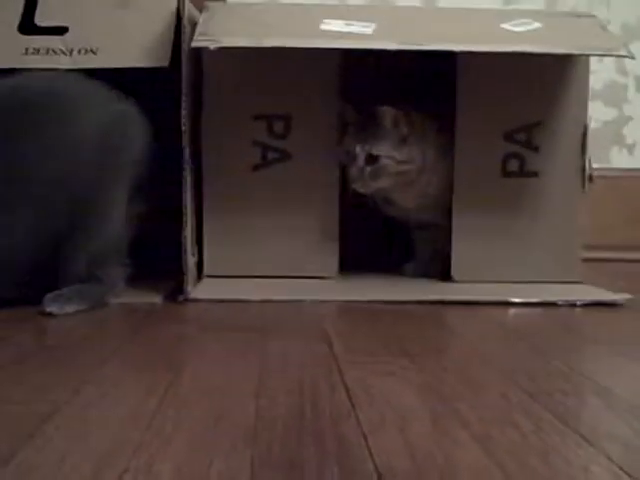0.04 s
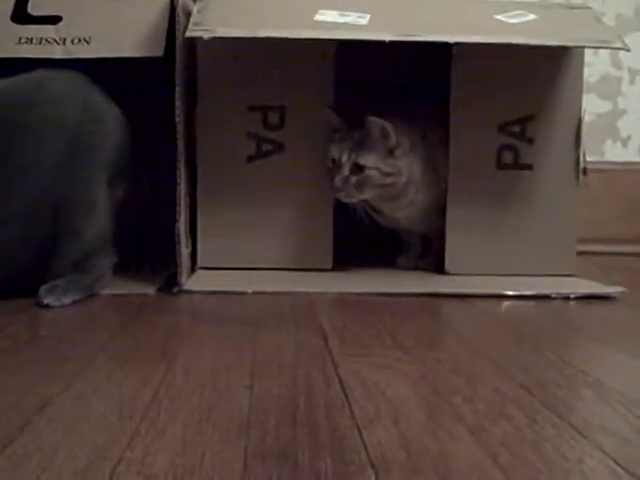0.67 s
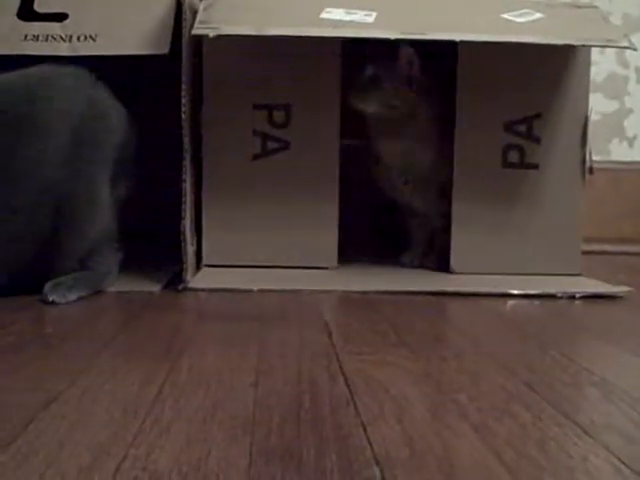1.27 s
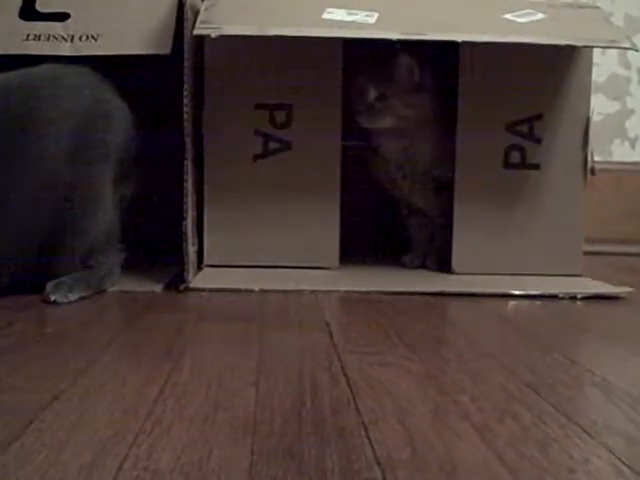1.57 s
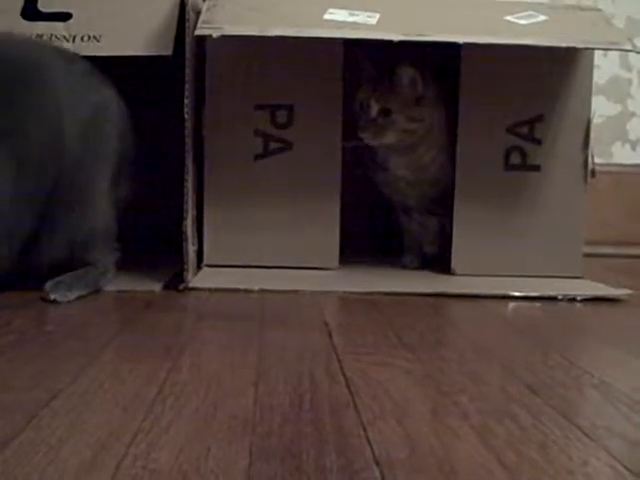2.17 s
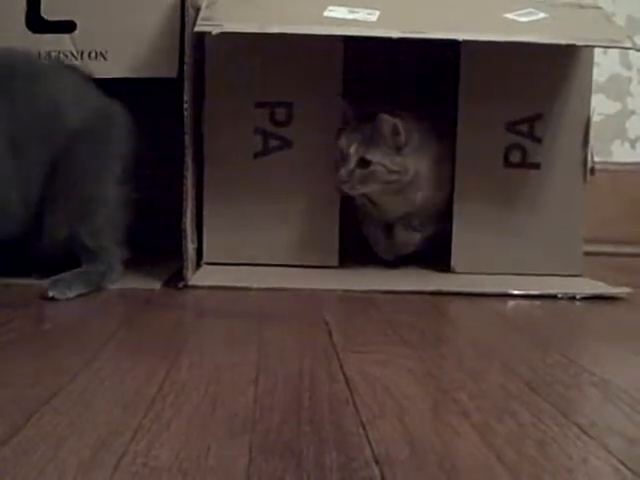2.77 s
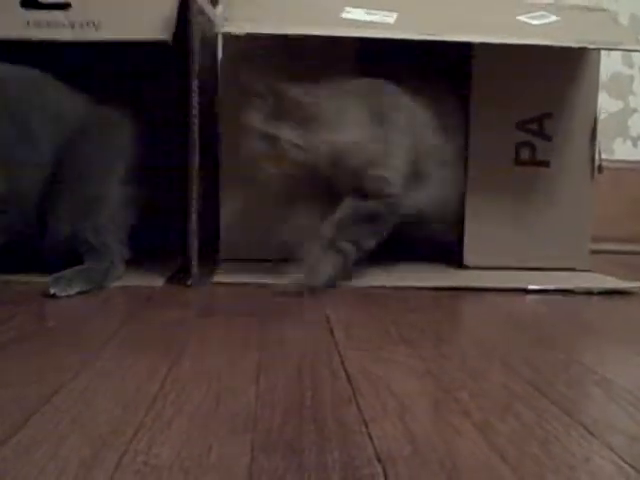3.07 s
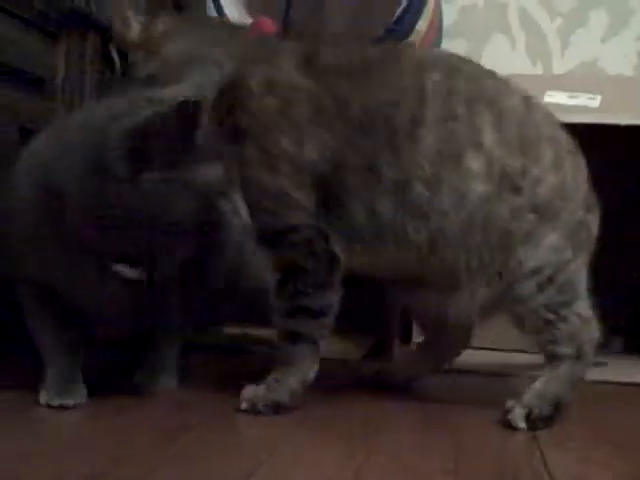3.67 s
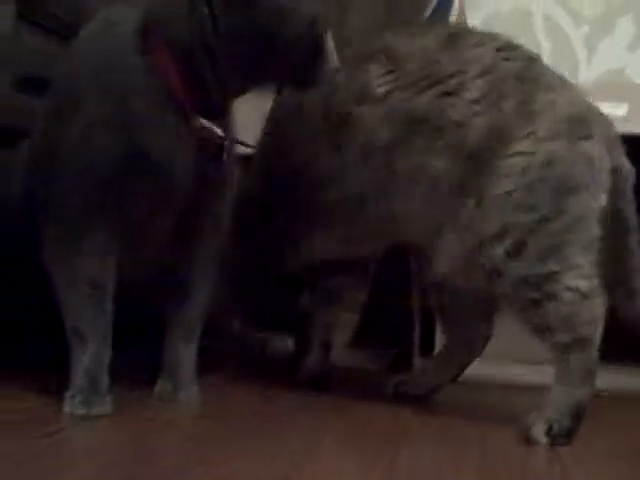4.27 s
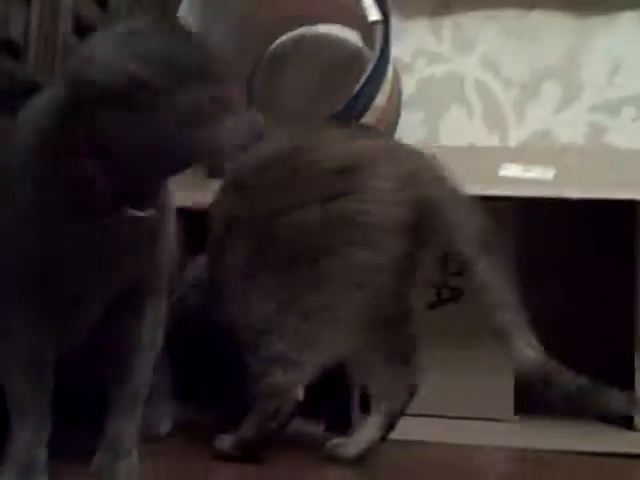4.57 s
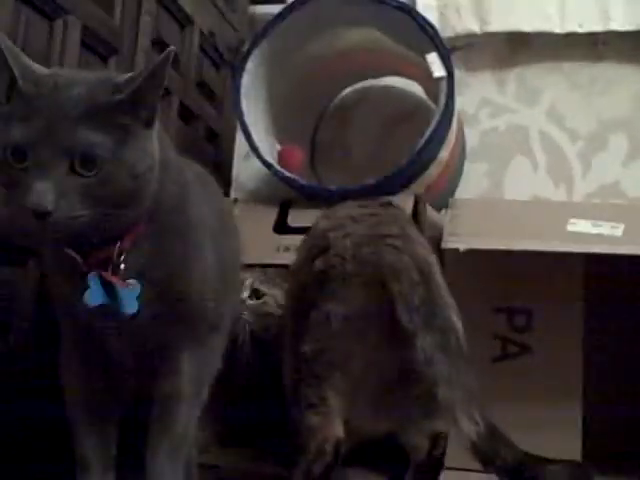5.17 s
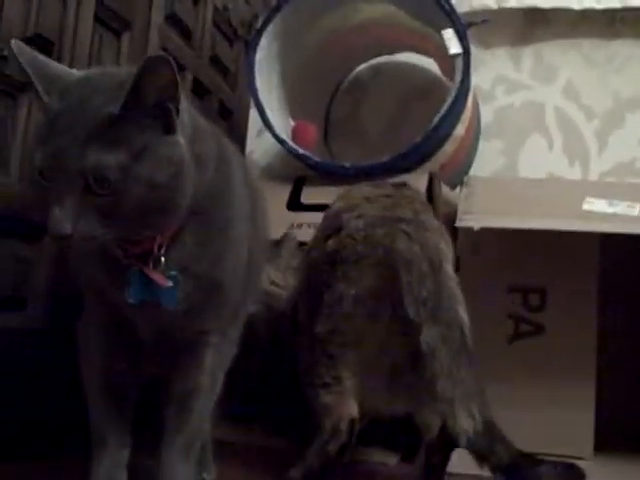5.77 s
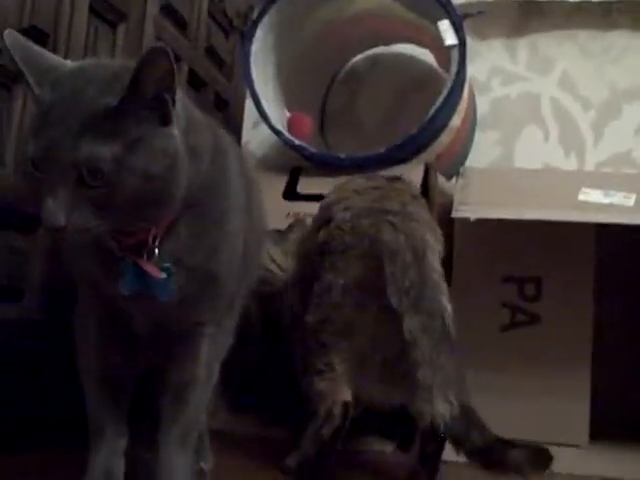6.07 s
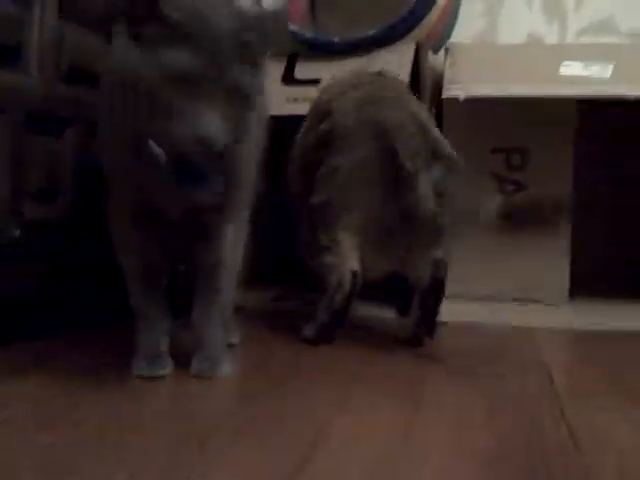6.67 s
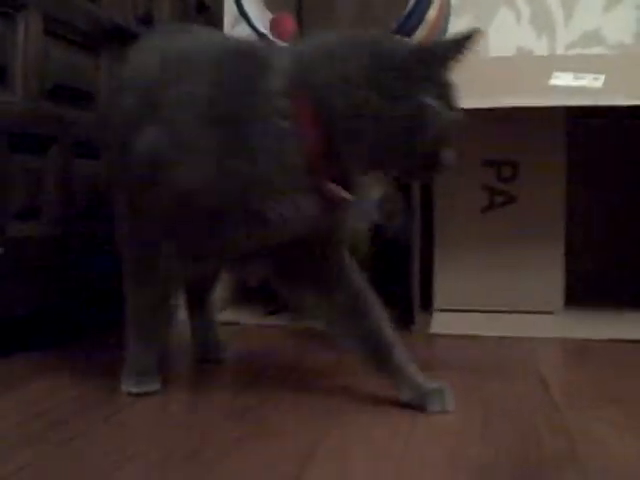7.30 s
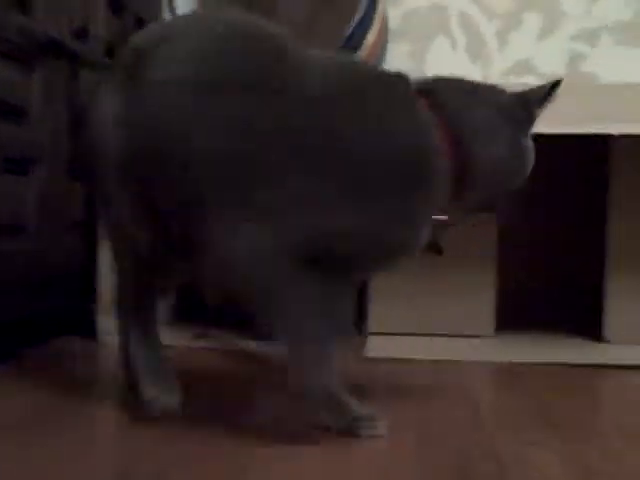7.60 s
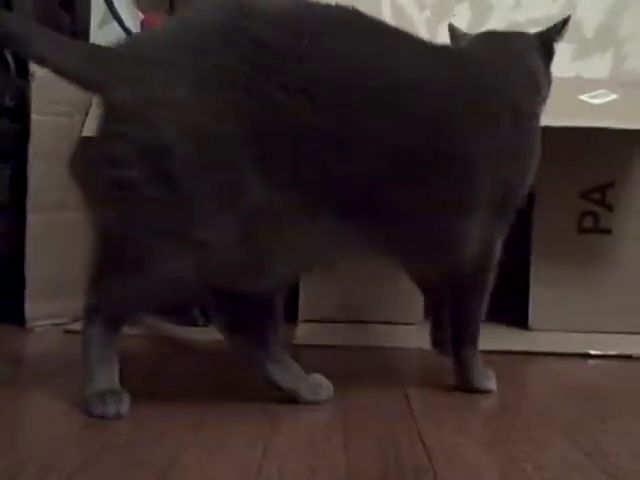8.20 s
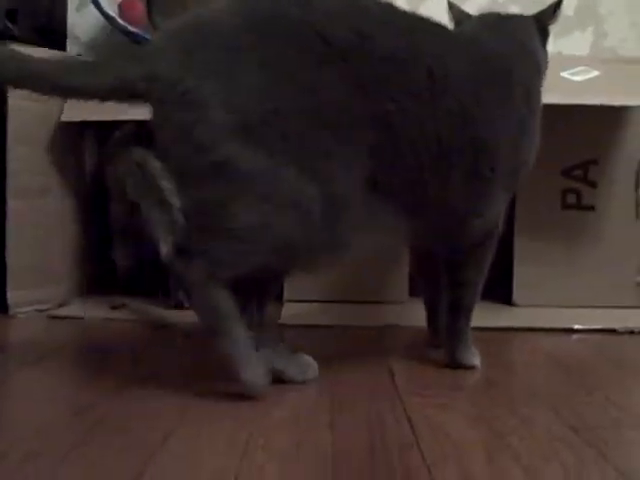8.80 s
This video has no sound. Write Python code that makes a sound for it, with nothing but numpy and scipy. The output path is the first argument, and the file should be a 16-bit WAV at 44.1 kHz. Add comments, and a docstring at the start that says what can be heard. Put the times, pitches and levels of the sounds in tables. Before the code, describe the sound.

Faint cardboard scratches and taps sound over a soft indoor hum, until a cat bursts through the box flaps with a quick cluster of booming bumps and a rasp. A nearby collar tag clinks, then jingles briefly twice more, among padded steps on floorboards and a slight rustle of fur. Scattered claw clicks trail off. The room adds a short echo, mostly to the box.

```python
"""Cardboard scrapes and rustles faintly in a quiet, humming room: two cats are playing around boxes.
One pushes out through the flaps, and the box booms in its low modes, slaps and rasps with friction.
The other's metal collar tag clinks against its ring in short bursts, quickly damped by fur.
Paws thump the wooden floor, claws tick and coats rustle; the room adds a short reverberation."""
import sys
import numpy as np
from scipy import signal
from scipy.fft import rfft
from scipy.io import wavfile

SR = 44100
rng = np.random.default_rng(int(sys.argv[2]) if len(sys.argv) > 2 else 0)


def wav_record(signal):
    """Record a signal, one row per channel, as 16-bit PCM in the file named by sys.argv[1]."""
    frames = np.transpose(np.atleast_2d(signal))
    bounded = np.clip(frames, -1, 1)
    # unit amplitude maps onto the largest positive 16-bit level
    quanta = np.round(bounded * 32767).astype(np.int16)
    wavfile.write(sys.argv[1], SR, quanta)


N = 394631
TIME = np.arange(N) / SR
AGE = TIME[:SR // 2]  # seconds since a blow

# resonances of the cardboard panels: centre_hz, width_hz, lift_db
PANEL_MODES = [(560, 90, 5), (845, 110, 1), (1290, 200, 4), (1764, 180, 4.5), (2430, 250, 1.5)]
# spectrum of rasping cardboard: frequency_hz, density_db
RASP_SPECTRUM = [(100, -45), (300, -2), (600, 2.5), (1300, -2), (2500, -1.5), (3800, -12), (8000, -27.5)]
# spectrum of sliding fur: frequency_hz, density_db
FUR_SPECTRUM = [(1000, -23), (3000, -5), (5000, -4.5), (8000, -3), (12000, -5.5), (15500, -5.5)]
# bending modes of the tag: pitch_hz
TAG_MODES_HZ = [10405, 11985, 15270]
# balance of those modes: level_db, change_at_centre_db
TAG_BALANCE = [(1, -2.5), (2, 7), (-3, -10.5)]


def box_bumps():
    """Forced vibration: the leaping cat's body drives the low modes of the box."""
    # bumps against the box: start_s, level_db
    bumps = [(3.075, -39.5), (3.143, -15.5), (3.1609, -12.5), (3.1955, -16.5), (3.292, -29), (3.347, -38),
             (3.424, -38)]
    # modes of the box: pitch_hz, level_db, t60_s
    box_modes = [(137.8, -3, 0.095), (168, -7, 0.075), (193.7, 0, .11), (252, -7.5, 0.085),
                 (371, -15, 0.059)]
    return thumps(bumps, box_modes, shudder_db=-12, shudder_t60=0.17)


def flap_slaps(rise_s=0.0019, ring_db=-17, ring_t60=0.037):
    """Impact excitation: flaps slap and buckle, ringing the stiff, well-damped panels."""
    # flap impacts: start_s, level_db, t60_s
    slaps = [(.2515, -54, 0.035), (1.919, -42.5, .035), (3.1443, -25, 0.085), (3.2647, -13, 0.03),
             (3.424, -41, .04), (3.55, -50, .04), (4.544, -49, 0.038)]
    # spectrum of a slap: frequency_hz, density_db
    spectrum = [(150, -16.5), (400, -5), (750, 6), (1300, 2.5), (2200, -10), (3500, -7.5), (6000, -7.5),
                (9000, -8), (15500, -33)]
    out = np.zeros(N)
    ring = sum(mode(hz, ring_db + lift, ring_t60) for hz, _, lift in PANEL_MODES)
    for s, db, t60 in slaps:
        slap = burst(spectrum, t60, PANEL_MODES) + ring
        add(out, s, amp(db) * slap * (1 - np.exp(-AGE / rise_s)))
    return out


def tag_clinks(clack_db=-2, clack_t60=0.035, snap_db=2, snap_t60=0.0029,
               linger_db=-26, linger_t60=.22, detune=0.003):
    """Plate bending: the striking point sets the mix of modes; fur damps all but a faint after-ring."""
    # blows on the tag: start_s, level_db, place (-1 rim to 1 centre), t60_s
    hits = [(3.235, -24, 0.62, .04), (3.3913, -34, 0.79, .023), (3.6554, -41, -.6, .11),
            (3.7244, -34, 0.54, 0.088), (3.8653, -44.5, 0.73, .035), (4.651, -37.5, 1, 0.068),
            (4.7424, -51, -.7, 0.026), (4.7602, -26, 1, 0.034), (4.7642, -23.5, .6, .024),
            (4.79, -38.5, -.2, .015), (4.8234, -34.5, -0.46, .05), (6.534, -21.5, 0.74, .11),
            (6.602, -36.5, -0.52, .026), (6.669, -33, 0.016, .08), (6.7239, -20, -0.54, .073),
            (6.743, -26.5, -0.22, .062), (6.792, -44.5, -.2, .14), (7.487, -61, -0.014, .06)]
    # spectrum of the metal contact: frequency_hz, density_db
    spectrum = [(150, -24), (500, -5.5), (1100, -12.5), (2300, -10.5), (5000, -10), (7300, -4), (10000, -8),
                (15500, -2)]
    out = np.zeros(N)
    for s, strength_db, place, t60 in hits:
        for hz, (mode_db, centre_db) in zip(TAG_MODES_HZ, TAG_BALANCE):
            db = strength_db + mode_db + place * centre_db
            bent_hz = hz * (1 + detune * rng.standard_normal())  # contact with the ring shifts the mode
            add(out, s, mode(bent_hz, db, t60) + mode(hz, db + linger_db, linger_t60))
        snap = amp(snap_db) * burst(spectrum, snap_t60)
        clack = amp(clack_db) * burst(spectrum, clack_t60)
        add(out, s, amp(strength_db) * (snap + clack))
    return out


def collar_fittings():
    """Free vibration: the loose split ring sings on after a blow; the clasp's modes die at once."""
    # blows on the ring and on the clasp: start_s, level_db
    ring_hits = [(6.669, -53), (6.7235, -41.5)]
    clasp_hits = [(4.7607, -21.5), (4.7917, -29), (4.824, -32), (6.7237, -21.5)]
    # modes of each part: pitch_hz, level_db, t60_s
    ring_modes = [(3359, -7, .32), (6767, 3, .15)]
    clasp_modes = [(3910, -7, 0.017), (4700, -15.5, 0.0086), (7700, -5.5, 0.0088), (8470, 0, 0.01),
                   (8700, -5, 0.0089)]
    out = np.zeros(N)
    for hits, modes in (ring_hits, ring_modes), (clasp_hits, clasp_modes):
        clink = sum(mode(*row) for row in modes)
        for s, db in hits:
            add(out, s, amp(db) * clink)
    return out


def box_rubbing(slips_per_s=2500, spread_db=3.0, clump_db=2.5, rasp_db=-2, fur_db=2):
    """Stick-slip friction: clumps of tiny slips drive the panels while fur hisses along the edges."""
    # paws and flanks scraping cardboard: peak_s, level_db, grip_s, release_s
    scrapes = [(.18, -62.5, 0.057, 0.065), (0.255, -53, .003, 0.02), (.29, -56, .007, 0.082),
               (.58, -59, 0.013, 0.031), (1.924, -46.5, 0.019, 0.023), (2.015, -52, .04, 0.035),
               (2.14, -66, .02, 0.036), (3.08, -48, 0.041, 0.15), (3.151, -32.5, 0.0047, 0.061),
               (3.268, -34.5, .003, 0.047), (3.52, -52, .006, .02), (4.55, -51.5, 0.0096, .025)]
    # fur brushing the edges: peak_s, level_db, swell_s
    brushes = [(.362, -58, 0.019), (.615, -57, 0.014), (.77, -68, 0.047), (1.862, -63.5, .016),
               (2.57, -62, 0.082), (3.075, -51.5, 0.091), (3.208, -40, 0.013), (3.278, -38.5, .028),
               (3.45, -63.5, 0.055), (4.55, -65, 0.023)]
    slip_size = amp(spread_db * np.minimum(rng.exponential(1, N), 4))
    slips = slip_size * rng.choice([-1, 1], N) * (rng.random(N) < slips_per_s / SR)
    hiss = unit(slips) / 2 + rng.standard_normal(N)
    grip = amp(clump_db * drift(70.4))
    rasp = sum(stroke(*row) for row in scrapes) * colour(slips, RASP_SPECTRUM, PANEL_MODES)
    fur = swells(brushes) * colour(hiss, FUR_SPECTRUM)
    return grip * (amp(rasp_db) * rasp + amp(fur_db) * fur)


def paw_falls():
    """Cushioned impact: soft paws excite the low modes of the floorboards."""
    # landings: start_s, level_db
    paws = [(3.21, -31), (3.405, -36.5), (3.446, -37), (4.547, -38), (4.581, -41.5), (4.728, -44),
            (4.784, -44), (7.039, -44.5)]
    # modes of the boards: pitch_hz, level_db, t60_s
    board_modes = [(77, -1.5, .15), (350, -1.5, .042)]
    return thumps(paws, board_modes, shudder_db=-5.5, shudder_t60=0.18)


def taps(tick_t60=0.024, click_db=-4, click_t60=0.0087):
    """Brief contacts have broad spectra: dry ticks, and clicks that ring one hollow resonance."""
    # ticks of claws and small collar parts: start_s, level_db, tilt_db_per_octave
    ticks = [(3.155, -21, 5.5), (4.264, -53, -3), (4.545, -41, -0.5), (4.593, -55, -1), (4.62, -54, 0),
             (4.92, -46, -2.5), (6.633, -52, 3), (6.655, -43, 5), (6.877, -52.5, 0), (7.05, -45.5, 2),
             (7.196, -42.5, 7.5), (7.344, -48.5, -1), (7.728, -49, 0.5), (7.805, -44.5, 0.5),
             (7.934, -54, -4), (7.972, -52.5, 0)]
    # spectrum of a tick: frequency_hz, density_db
    spectrum = [(200, -11.5), (1200, -2), (3500, 0), (6000, -6), (15500, -5)]
    # hollow knocks and pops: start_s, level_db, pitch_hz, t60_s
    pops = [(0.575, -51.5, 2370, 0.052), (1.598, -51, 595, 0.051), (1.917, -50, 827, 0.12),
            (6.876, -47.5, 568, 0.042), (7.416, -40.5, 1320, 0.029), (7.429, -46, 1560, 0.026),
            (7.969, -47.5, 595, 0.053), (8.635, -57, 1592, 0.034)]
    out = np.zeros(N)
    for s, db, tilt in ticks:
        tilted = [(hz, level + tilt * np.log2(hz)) for hz, level in spectrum]
        add(out, s, amp(db) * burst(tilted, tick_t60))
    for s, db, hz, t60 in pops:
        add(out, s, mode(hz, db, t60) + amp(db + click_db) * burst(RASP_SPECTRUM, click_t60))
    return out


def coat_rustle(flutter_db=2):
    """Friction noise: fur slides under the collar with a soft, uneven hiss."""
    # turns and steps of the cats: peak_s, level_db, swell_s
    moves = [(2.05, -67, 0.23), (4.29, -70.5, 0.11), (4.68, -65.5, .1), (5.06, -68, 0.067),
             (6.52, -58.5, .1), (7.05, -58.5, 0.011), (7.4, -70, 0.36)]
    return swells(moves) * amp(flutter_db * drift(25)) * colour(rng.standard_normal(N), FUR_SPECTRUM)


def squeak(jitter=.07, flutter_db=3):
    """Random modulation of pitch and level roughens a faint, thin tone."""
    # course of the squeak: time_s, level_db, pitch_hz
    contour = [(7.43, -77, 1610), (7.6, -66.5, 1705), (7.76, -74, 1670)]
    s, db, hz = np.transpose(contour)
    pitch_hz = np.interp(TIME, s, hz) * (1 + jitter * drift(146))
    level = amp(np.interp(TIME, s, db) + flutter_db * drift(50)) * (TIME > s[0]) * (TIME < s[-1])
    return level * np.sin(2 * np.pi * np.cumsum(pitch_hz) / SR)


def tag_shimmer(width_hz=45):
    """Frictional excitation: sliding on its ring keeps the tag's modes sounding unevenly."""
    # slides of the tag: peak_s, level_db, swell_s
    slides = [(2.06, -70, 0.045), (2.24, -72, 0.058)]
    ring = sum(amp(db + centre_db) * drift(width_hz) * np.sin(2 * np.pi * hz * TIME)
               for hz, (db, centre_db) in zip(TAG_MODES_HZ, TAG_BALANCE))
    return swells(slides) * unit(ring)


def room_echoes(x, early_db=-11, early_t60=0.028, tail_db=-16, delay_s=0.0066, build_up_s=0.015):
    """Reverberation: early reflections off floor and boxes, then a tail whose treble dies first."""
    # reverberation times: frequency_hz, t60_s
    decay_times = [(100, 1), (500, 0.88), (3000, 0.44), (11000, 0.35), (16000, 0.27)]
    hz, t, bands = signal.stft(rng.standard_normal(len(AGE)), SR, nperseg=256)
    bands *= np.exp(-np.log(1000) * t / read(decay_times, hz)[:, None])
    tail = signal.istft(bands, SR, nperseg=256)[1][:len(AGE)]
    tail *= 1 - np.exp(-(AGE / build_up_s) ** 2)
    early = rng.standard_normal(len(AGE)) * (rng.random(len(AGE)) < 2000 / SR)  # 2000 echoes a second
    early *= fade(early_t60) * (AGE > delay_s)
    response = amp(early_db) * early / np.linalg.norm(early) + amp(tail_db) * tail / np.linalg.norm(tail)
    return signal.fftconvolve(x, response)[:N]


def room_tone(air_db=-59, waver_rad=0.13):
    """Background noise: steady broadband air, and an appliance's hum wavering in phase."""
    # spectrum of the air noise: frequency_hz, density_db
    spectrum = [(12, -41.5), (20, -13.5), (64, -6.5), (85, -12), (175, -8.5), (207, -14.5), (238, -8.5),
                (282, -14), (352, -16), (478, -16.5), (631, -21.5), (1380, -28), (1580, -27), (2090, -30.5),
                (15500, -41.5)]
    # partials of the hum: pitch_hz, level_db
    partials = [(60, -72.5), (239, -63)]
    hum = sum(amp(db) * unit(np.sin(2 * np.pi * (hz * TIME + rng.random()) + waver_rad * drift(1.3)))
              for hz, db in partials)
    return amp(air_db) * colour(rng.standard_normal(N), spectrum) + hum


def thumps(hits, modes, shudder_db, shudder_t60, rise_s=0.00515):
    """Modal superposition: a padded blow builds up, rings the low modes and shakes the rest."""
    # spectrum of the dull shudder: frequency_hz, density_db
    spectrum = [(30, -16), (80, -14), (135, -6.5), (200, 3), (360, -4.5), (550, -13), (1200, -22.5),
                (4000, -62.5)]
    out = np.zeros(N)
    ring = sum((-1) ** k * mode(*row) for k, row in enumerate(modes))  # neighbours push opposite ways
    for s, db in hits:
        blow = ring + amp(shudder_db) * burst(spectrum, shudder_t60)
        add(out, s, amp(db) * blow * (1 - np.exp(-AGE / rise_s)))
    return out


def mode(hz, db, t60):
    """A damped harmonic oscillator, struck once."""
    return amp(db) * fade(t60) * np.sin(2 * np.pi * hz * AGE)


def burst(spectrum, t60, peaks=()):
    """Modal overlap: dense modes merge into decaying noise."""
    return colour(rng.standard_normal(len(AGE)), spectrum, peaks) * fade(t60)


def fade(t60):
    """Exponential decay, by 60 dB in t60 seconds."""
    return np.exp(-np.log(1000) * AGE / t60)


def stroke(peak_s, db, rise_s, fall_s):
    """Envelope of one rub: exponential growth, then decay."""
    late = TIME - peak_s
    return amp(db) * np.exp(-np.maximum(-late / rise_s, late / fall_s))


def swells(rows, settle_ratio=1.88):
    """Envelope of soft strokes that settle more slowly than they swell."""
    return sum(stroke(s, db, swell_s, settle_ratio * swell_s) for s, db, swell_s in rows)


def colour(x, spectrum, peaks=()):
    """Filters x by a smooth spectrum with resonant peaks, to rms 1."""
    hz = np.fft.rfftfreq(len(x), 1 / SR)
    resonance_db = sum(lift / (1 + (2 * (hz - centre) / width) ** 2) for centre, width, lift in peaks)
    return unit(np.fft.irfft(rfft(x) * amp(read(spectrum, hz) + resonance_db), len(x)))


def drift(rate_hz):
    """Random fluctuation: low-passed noise of rms 1."""
    hz = np.fft.rfftfreq(N, 1 / SR)
    return unit(np.fft.irfft(rfft(rng.standard_normal(N)) * np.exp(-(hz / rate_hz) ** 2), N))


def read(points, hz):
    """Interpolates on a log-frequency axis."""
    point_hz, value = np.transpose(points)
    return np.interp(np.log(hz + 1), np.log(point_hz), value)


def amp(db):
    """Decibels to gain."""
    return 10 ** (np.asarray(db) / 20)


def unit(x):
    """Scales to rms 1."""
    return x / np.sqrt(np.mean(x ** 2) + 1e-20)


def add(mix, start_s, sound):
    """Superposes a sound on the mix."""
    part = mix[round(start_s * SR):][:len(sound)]
    part += sound[:len(part)]


def scene(box_wet_db=2, thump_wet_db=-1, fittings_wet_db=-5):
    """Direct-to-reverberant ratio: the collar is near; the boxes, off by the wall, carry more echo."""
    near = tag_clinks() + tag_shimmer() + taps() + squeak() + coat_rustle()
    fittings = collar_fittings()
    boxes = flap_slaps() + box_rubbing()
    blows = box_bumps() + paw_falls()
    to_room = near + amp(fittings_wet_db) * fittings + amp(box_wet_db) * boxes + amp(thump_wet_db) * blows
    return (near + fittings + boxes + blows + room_echoes(to_room) + room_tone())[None]


def record(dry, cutoff_hz=15950):
    """Band limiting: a steep low-pass removes the highest treble."""
    low_pass = signal.firwin(301, cutoff_hz, window=("kaiser", 8), fs=SR)
    return signal.oaconvolve(dry, low_pass[None], "same")


dry = scene()
out = record(dry)
wav_record(out)
```